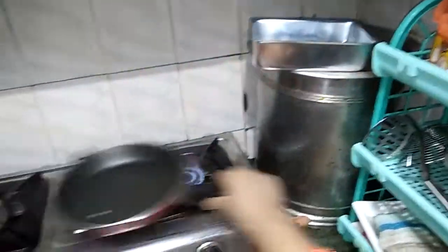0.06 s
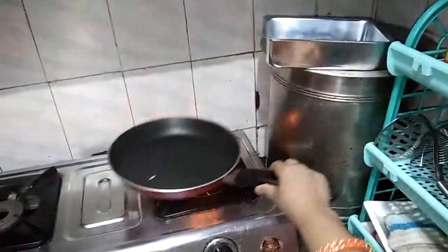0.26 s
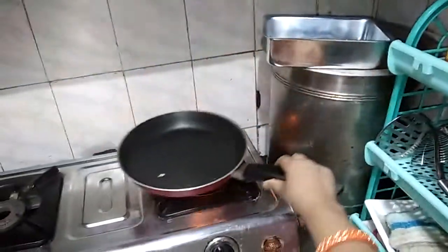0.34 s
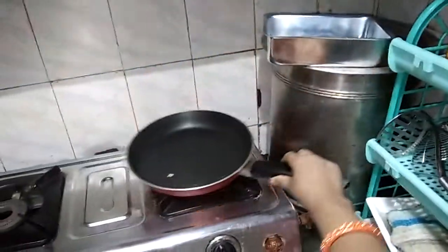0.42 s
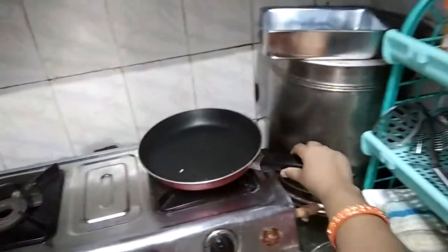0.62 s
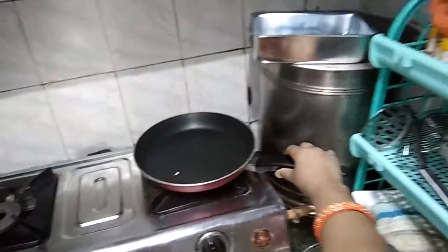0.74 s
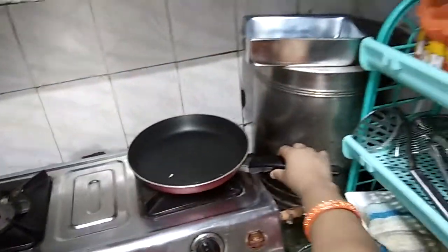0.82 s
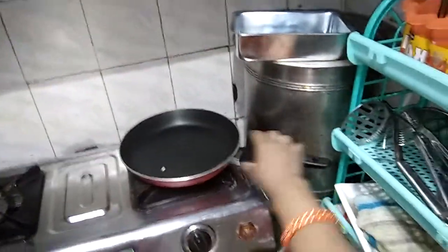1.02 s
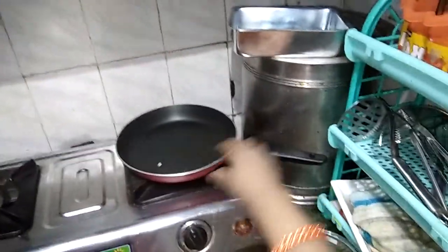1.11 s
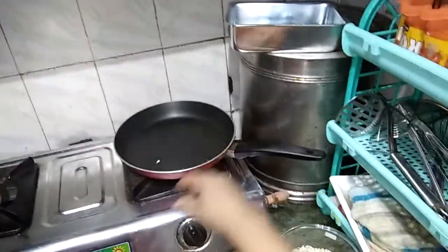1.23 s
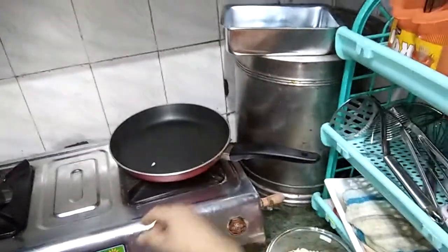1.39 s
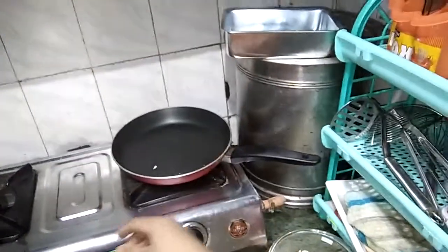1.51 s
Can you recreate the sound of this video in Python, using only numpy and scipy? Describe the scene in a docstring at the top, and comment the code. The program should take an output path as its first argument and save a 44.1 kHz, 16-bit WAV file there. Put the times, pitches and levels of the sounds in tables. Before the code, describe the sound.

Close by in a small kitchen, a metal pan rattles down onto a stove grate. It is pushed across with a juddering squeal, drops into its seat and rings faintly, over the soft hiss of a lit gas burner.

```python
"""A small tiled kitchen, heard almost in mono. A frying pan lands rattling on the grate of a lit gas stove,
is pushed across it with a squealing, juddering scrape, and drops into its seat, where it rings on and
rocks once. Each impact excites the damped modes of the pan and of the sheet-steel stove top, while
friction sustains the modes of the scrape. The burner hisses; beneath it a low rumble comes and goes."""
import sys
import numpy as np
from scipy import signal
from scipy.fft import rfft, irfft, next_fast_len
from scipy.io import wavfile
from scipy.ndimage import map_coordinates

SR = 44100
rng = np.random.default_rng(int(sys.argv[2]) if len(sys.argv) > 2 else 0)


def output_pcm(signal):
    """Save a mono or channel-first signal as 16-bit PCM at the path in sys.argv[1].

    Samples are clipped to [-1, 1] before scaling.
    """
    pcm = np.clip(np.atleast_2d(signal).T, -1, 1) * 32767
    wavfile.write(sys.argv[1], SR, np.round(pcm).astype(np.int16))


N = 68355
T = np.arange(N) / SR
HARD_ATTACK_S, SOFT_ATTACK_S = .0013, .0017


def clatter():
    """Impact excitation: each contact rings the strong and the weak modes of stove top and pan."""
    # Each row: start in seconds, stove and pan gains in dB, treble tilt in dB per octave.
    contacts = [(.194, -20, -44, -16), (.2, -15, -48, 1.5), (.206, -14, -24, 8), (.211, -15, -22, 2.5),
                (.218, -23.5, -16.5, 10.5), (.228, -12, -24, 3), (.234, -15, -42, 2),
                (.241, -24, -17.5, 7.5), (.254, -16, -16, 4.5), (.263, -11, -34, -12),
                (.276, -15, -21.5, -1), (.291, -18, -29, -4), (.612, -27.5, -24, 4), (0.653, -19.5, -32, 5),
                (.788, -35, -28.5, 7), (.794, -33, -20.5, 8.5), (.801, -28, -19, 6.5),
                (.809, -23, -21, 4.5)]
    # Each row: frequency in Hz, relative level in dB, 60 dB decay time in seconds.
    stove_modes = [(159.3, -23.5, .5), (456.6, -12, 0.43), (727, -8.5, 0.21), (869, -9.5, 0.31),
                   (1236, -10, 0.61), (1290, -24, 0.68), (1335, -7, 0.26), (1457, -5, 0.15),
                   (1900, -7, 0.24), (2433, -6, 0.22), (4120, -3.5, 0.11), (4590, -14, 0.16),
                   (4414, -9, 0.25), (4984, -5.5, 0.13), (7370, -30.5, 0.082), (8060, -25, 0.085)]
    pan_modes = [(916, 2, 0.083), (1152, -19, 0.34), (1535, -21, 0.64), (2163, -19, 0.2),
                 (2420, -4.5, 0.067), (2840, -16, 0.22), (3380, -15.5, .2), (3464, -10, 0.095),
                 (3865, -6, 0.16), (4207, -5.5, 0.16), (4490, -10, 0.28), (5047, -11.5, 0.12),
                 (5960, -16.5, 0.13), (7590, -29, .07)]
    # The weak modes. Each row: frequency in Hz, relative spectral density in dB.
    stove_wash = [(29, -46.5), (50, -20), (380, -12), (459, -9), (701, -2), (808, -6), (1260, -1),
                  (3570, -12.5), (4310, 0), (5450, -16), (14000, -48)]
    pan_wash = [(120, -50), (200, -25.5), (786, -2), (1410, -1), (3380, -6.5), (3630, -15), (3960, -1),
                (7120, -44), (14000, -58)]
    stove_peaks, pan_peaks = treble_peaks(), treble_peaks()
    out = np.zeros(N)
    for start, stove_db, pan_db, tilt_db in contacts:
        stove = amp(-8.5) * ring(stove_modes, tilt_db, scatter_db=1.5)
        stove += amp(-5.5) * wash(stove_wash, stove_peaks, tilt_db)
        pan = amp(-5.5) * ring(pan_modes, tilt_db, scatter_db=1.0)
        pan += amp(-5.5) * wash(pan_wash, pan_peaks, tilt_db)
        out += at(start, (amp(stove_db) * stove + amp(pan_db) * pan) * rise(HARD_ATTACK_S))
    return out


def scrape():
    """Stick-slip friction: the rim squeals, then the base grinds unevenly while the pan's wall whines."""
    # Each row: time in seconds, level in dB.
    squeal_level = [(.606, -72), (.616, -18.5), (.63, -24), (.652, -24), (.68, -32), (.72, -32.5),
                    (.765, -45), (.8, -30), (.9, -73)]
    whine_level = [(.648, -86.5), (.658, -23.5), (.685, -19.5), (.752, -31.5), (.785, -46), (.86, -92)]
    grind_level = [(.648, -65), (.657, -14.5), (.672, -19), (.69, -23.5), (.708, -16.5), (.73, -20),
                   (.755, -22.5), (.775, -28), (.81, -43), (.95, -65)]
    # Each row: frequency in Hz, relative level in dB.
    squeal_modes = [(1252, -9.5), (1485, -9), (1986, -11), (2795, 1), (3393, -1), (3828, -9), (4960, -3),
                    (5825, -16.5), (8473, -29.5)]
    whine_modes = [(1712, -9), (1775, -3.5), (2169, -7.5), (2880, -10.5), (3790, -2.5), (4384, 2),
                   (6218, -22.5), (7200, -27.5)]
    grind_modes = [(915, -3), (1031, -3), (1103, 3), (1303, 0)]
    grit_spectrum = [(150, -65), (635, -19), (906, -3.5), (2280, -21), (4490, -28), (5200, -37),
                     (14000, -64.5)]
    slips = amp(2.5 * wobble(per_s=219))
    squeal = level(squeal_level) * bowed(squeal_modes, waver=.39, quality=80)
    whine = level(whine_level) * bowed(whine_modes, waver=.55, quality=90)
    grind = bowed(grind_modes, waver=.41, quality=39.75)
    grit = amp(-4) * unit(slips * noise(grit_spectrum))
    return squeal + whine + level(grind_level) * (grind + grit)


def rocking():
    """Damped resonance: the rocking base knocks hollowly, pitched by where it touches."""
    # Each row: start in seconds, level in dB, frequency in Hz.
    knocks = [(.654, -5, 1115), (.6576, -10.5, 1083), (.696, -10.5, 913), (.704, -11.5, 1147),
              (1.162, -31.5, 918), (1.165, -34.5, 1077), (1.181, -31, 1065)]
    t60_s = .058
    return sum(at(start, rise(SOFT_ATTACK_S) * ring([(hz, db, t60_s)])) for start, db, hz in knocks)


def thumps():
    """Constant-Q decay: the stove body thumps under the pan's weight, lower modes lasting longer."""
    # Each row: start in seconds, level in dB, frequency in Hz.
    blows = [(0.197, -23.5, 169), (0.193, -27, 79), (0.199, -22.5, 290), (0.254, -31.5, 73),
             (0.648, -30.5, 160), (1.007, -36.5, 82.5), (1.19, -36.5, 78)]
    t60_cycles = 15
    return sum(at(start, rise(.012) * ring([(hz, db, t60_cycles / hz)])) for start, db, hz in blows)


def singing():
    """Exponential decay: one mode of the seated pan rings on, then dies away faster."""
    # Frequency in Hz, starting level in dB, free 60 dB decay time in seconds.
    mode = (1190, -37.5, 1.71)
    hz, db, t60 = mode
    seated_s, damped_s, damping_db_per_s = .809, 1.083, 59
    note = amp(db - 60 * T / t60) * bowed([(hz, 0)], waver=.3, quality=29.4)
    return at(seated_s, note) * amp(-damping_db_per_s * np.maximum(T - damped_s, 0))


def nudge():
    """Impulse response: one soft nudge draws a small ping from the pan."""
    # Each row: frequency in Hz, level in dB, 60 dB decay time in seconds.
    modes = [(900, -37.5, 0.22), (1070, -30.5, 0.053), (1325, -26.5, 0.066), (1720, -39.5, 0.075),
             (2450, -34, 0.045)]
    return at(.48, rise(SOFT_ATTACK_S) * ring(modes))


def ticks():
    """Narrow-band transients: light touches of metal, each a noise burst around one pitch."""
    # Each row: start in seconds, level in dB, centre frequency in Hz.
    touches = [(.002, -49, 2050), (0.516, -46, 4500), (0.574, -47, 4080), (0.905, -41.5, 4640),
               (1.129, -48.5, 4640), (1.378, -43.5, 2363), (1.416, -55, 2260), (1.418, -53.5, 3450)]
    width_octaves, skirt_db, t60_s = .17, -22, .19
    out = np.zeros(N)
    for start, db, centre_hz in touches:
        peak = lambda hz: np.exp(-(np.log2((hz + 1) / centre_hz) / width_octaves) ** 2 / 2)
        skirt = lambda hz: amp(skirt_db) / (1 + (hz / centre_hz / 2) ** 2)
        band = unit(filtered(rng.standard_normal(N), lambda hz: peak(hz) + skirt(hz)))
        out += at(start, band * amp(db - 60 * T / t60_s) * rise(HARD_ATTACK_S))
    return out


def hand():
    """Sliding friction: the hand stirs faint, broad resonances as it leaves the handle."""
    # Each row: time in seconds, level in dB.
    rub_level = [(1.005, -48), (1.06, -60.5), (1.24, -52.5), (1.35, -67)]
    # Each row: frequency in Hz, relative level in dB.
    rub_modes = [(188, -5.5), (307, -7), (583, -2), (2100, -11), (2860, -3), (4590, 1)]
    start = rub_level[0][0]
    return (T > start) * level(rub_level) * bowed(rub_modes, waver=3.1, quality=12)


def burner():
    """Flow noise: the gas hisses, and its treble flickers."""
    # Each row: time in seconds, level in dB.
    hiss_level = [(0, -53), (.1, -58), (.55, -53.5), (1.24, -55), (1.34, -62.5), (1.55, -58.5)]
    # Each row: frequency in Hz, relative spectral density in dB.
    hiss_spectrum = [(110, -55), (170, -13.5), (360, -6), (500, -7.5), (700, -6.5), (1200, -4.5),
                     (2100, -9.5), (4600, -8), (5700, -19.5), (8600, -18.5), (11000, -30.5), (14000, -29)]
    hiss = noise(hiss_spectrum)
    top = filtered(hiss, lambda hz: hz > 5750)
    flicker = amp(3.5 * unit(wobble(per_s=32) + wobble(per_s=3.2)))
    return level(hiss_level) * (hiss - top + flicker * top)


def rumble():
    """Modulated noise: a low, uneven handling rumble comes and goes."""
    # Each row: time in seconds, level in dB.
    rumble_level = [(.4, -51), (.47, -65), (.59, -65), (.7, -44.5), (.84, -53), (.88, -71), (.99, -75),
                    (1.05, -53), (1.5, -60.5)]
    # Each row: frequency in Hz, relative spectral density in dB.
    rumble_spectrum = [(20, -21), (50, -12), (73, -2.5), (96, 0), (125, -30), (400, -52)]
    return level(rumble_level) * noise(rumble_spectrum)


def ring(modes, tilt_db=0, scatter_db=0):
    """Modal superposition: damped sines, with level and phase scattered anew at each blow."""
    t = T[:SR * 3 // 4]
    out = np.zeros(len(t))
    for hz, db, t60 in modes:
        envelope = treble(hz, tilt_db) * amp(db + scatter_db * rng.normal() - 60 * t / t60)
        out += envelope * np.sin(2 * np.pi * hz * t + scatter_db * rng.normal())
    return np.pad(out, (0, N - len(t)))


def wash(spectrum, peaks, tilt_db):
    """Modal overlap: countless weak modes merge into a crack and a tail that dies by band in the room."""
    # Each row: frequency in Hz, 60 dB decay time of the tail in seconds.
    decay_times = [(100, 0.18), (500, .3), (1200, 0.23), (2500, 0.26), (4500, 0.25), (8000, 0.21),
                   (14000, 0.17)]
    crack_db, crack_t60_s = -.5, .042
    hz, t, bands = signal.stft(filtered(noise(spectrum), peaks), SR, nperseg=256)
    decay = amp(-60 * t / along(decay_times, hz)[:, None])
    tail = signal.istft(bands * treble(hz, tilt_db)[:, None] * decay, SR, nperseg=256)[1][:N]
    return tail * (1 + amp(crack_db - 60 * T / crack_t60_s))


def bowed(modes, waver, quality):
    """Line broadening: sustained modes waver in strength and phase over a width of pitch / quality."""
    out = np.zeros(N)
    for hz, db in modes:
        unsteady = waver * (wobble(hz / quality) + 1j * wobble(hz / quality))
        carrier = np.exp(2j * np.pi * (hz * T + rng.random()))
        out += amp(db) * unit(np.real((1 + unsteady) * carrier))
    return unit(out)


def treble_peaks():
    """Modal bunching: one object's irregular treble peaks, as a gain against frequency."""
    knots = rng.standard_normal(4096)
    depth_db, spacing_hz = 3.5, 70
    return lambda hz: unit(
        amp(depth_db * np.minimum(hz / 5000, 1) * map_coordinates(knots, [hz / spacing_hz])))


def treble(hz, tilt_db):
    """Contact stiffness: harder blows are brighter above 3 kHz."""
    return amp(tilt_db * np.log2(1 + (hz / 3000) ** 2) / 2)


def rise(attack_s):
    """Exponential onset of a blow."""
    return 1 - np.exp(-T / attack_s)


def noise(spectrum):
    """Coloured noise of rms 1."""
    return unit(filtered(rng.standard_normal(N), lambda hz: amp(along(spectrum, hz))))


def wobble(per_s):
    """Smooth random modulation with per_s knots a second."""
    return map_coordinates(rng.standard_normal(4096), [T * per_s], mode="wrap")


def filtered(x, response):
    """Linear filtering: the spectrum of x times a frequency response."""
    size = next_fast_len(N + SR // 4)
    return irfft(rfft(x, size) * response(np.fft.rfftfreq(size, 1 / SR)), size)[..., :N]


def along(points, hz):
    """Interpolation of (Hz, value) points on a logarithmic frequency axis."""
    knots_hz, values = np.transpose(points)
    return np.interp(np.log(hz + 1), np.log(knots_hz + 1), values)


def level(points):
    """Amplitude envelope through (seconds, dB) points."""
    return amp(np.interp(T, *np.transpose(points)))


def at(start, x):
    """Delay of x by start seconds."""
    return np.pad(x, (max(round(start * SR), 0), 0))[:N]


def amp(db):
    """Decibels to gain."""
    return 10 ** (np.asarray(db) / 20)


def unit(x):
    """Normalisation to rms 1."""
    return x / np.sqrt(np.mean(x ** 2) + 1e-20)


def scene():
    """Mid-side stereo: a faint delayed copy of the treble slightly widens the near-mono sound."""
    mid = clatter() + singing() + scrape() + rocking() + thumps() + nudge() + ticks()
    mid += hand() + burner() + rumble()
    side_delay_s = .003
    side = amp(-11.5) * at(side_delay_s, filtered(mid, lambda hz: hz > 7100))
    return np.array([mid + side, mid - side])


def record(dry):
    """Soft saturation rounds the highest peaks, and a low-pass limits the bandwidth."""
    ceiling, top_hz = .91, 14450
    rounded = dry / (1 + np.abs(dry / ceiling) ** 6) ** (1 / 6)
    return filtered(rounded, lambda hz: hz < top_hz)


dry = scene()
out = record(dry)
output_pcm(out)
```